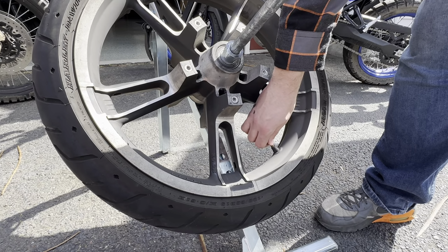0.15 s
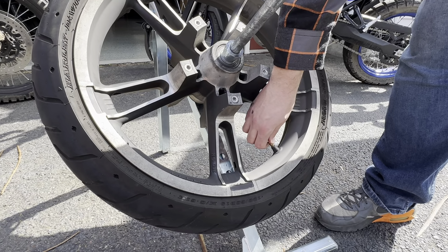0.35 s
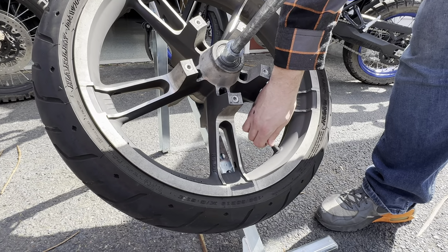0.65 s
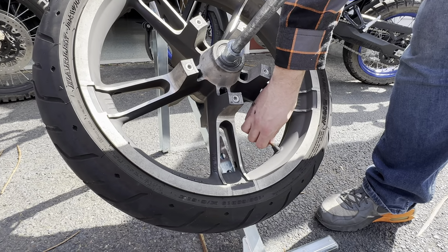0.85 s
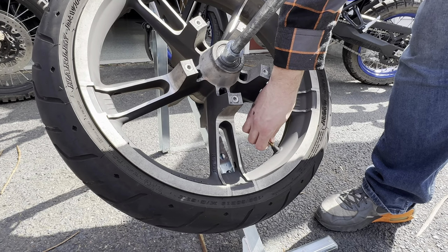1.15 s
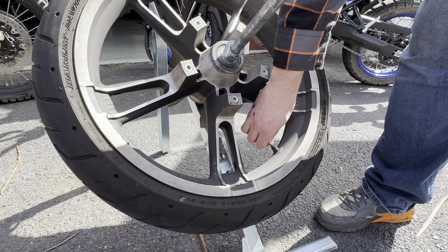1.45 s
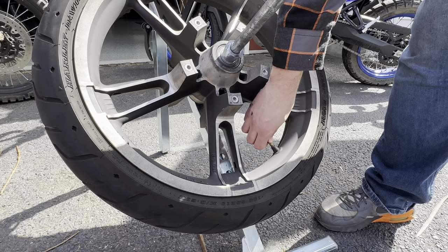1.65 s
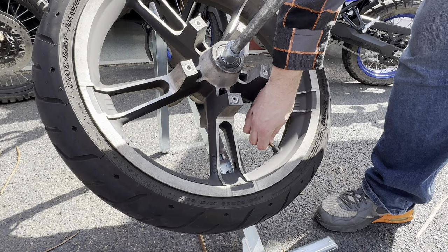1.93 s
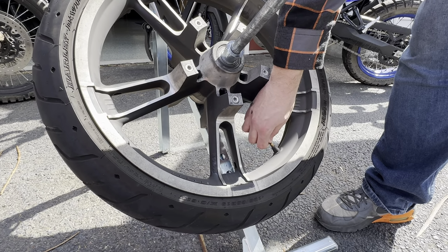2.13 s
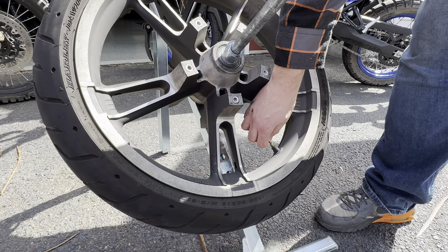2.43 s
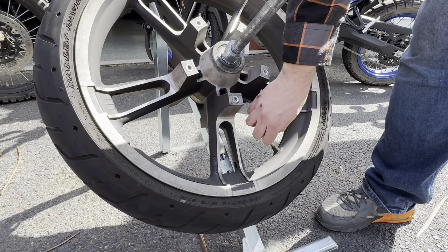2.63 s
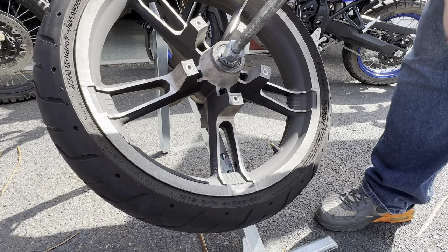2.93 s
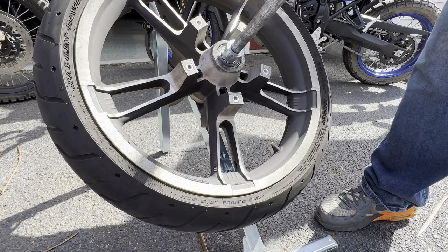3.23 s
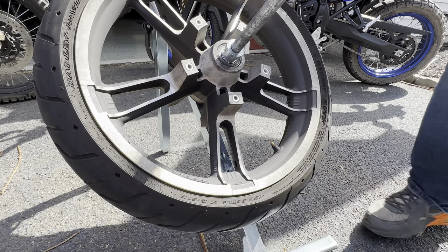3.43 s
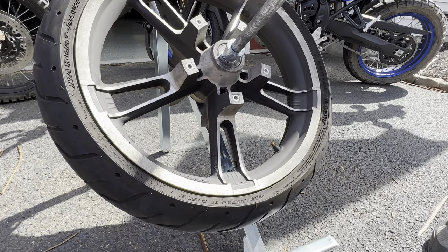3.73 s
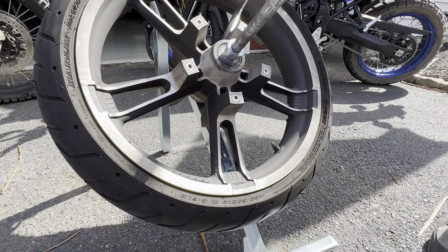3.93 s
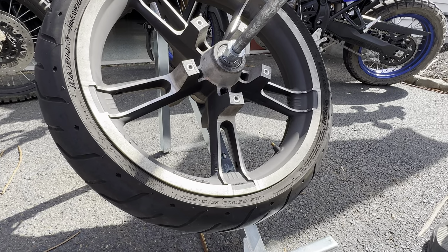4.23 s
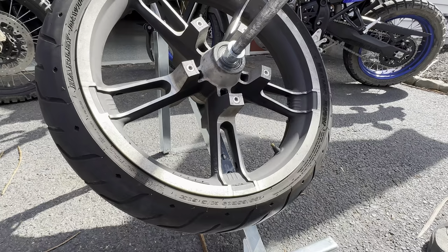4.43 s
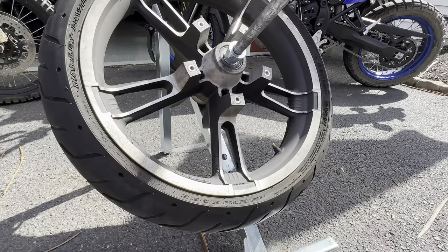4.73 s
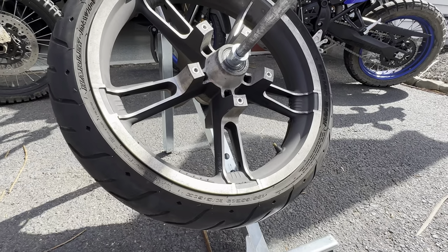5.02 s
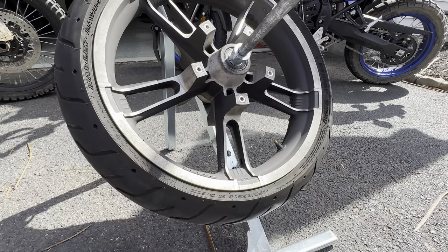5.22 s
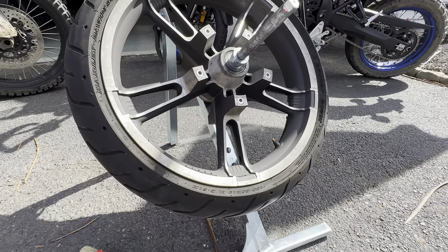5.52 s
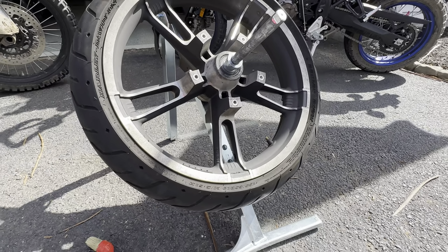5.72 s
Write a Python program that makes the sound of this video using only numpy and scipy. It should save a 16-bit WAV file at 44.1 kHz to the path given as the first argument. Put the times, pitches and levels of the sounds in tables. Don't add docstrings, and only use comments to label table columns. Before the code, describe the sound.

Close to a motorcycle wheel in a paved yard, short thin hisses spit irregularly from the valve over very faint traffic rumble. The seal pops and air roars out between fingers in uneven surges. The hand lets go, leaving a brighter open jet with a brief low hum from the tire, then a quieter steady hiss that gradually sinks. Dry, centred, near microphone.

```python
import sys
import numpy as np
from scipy import signal
from scipy.fft import rfft, irfft, next_fast_len
from scipy.io import wavfile
from scipy.ndimage import uniform_filter1d, map_coordinates

SR = 44100
rng = np.random.default_rng(int(sys.argv[2]) if len(sys.argv) > 2 else 0)


def waveform_to_disk(signal):
    frames = np.transpose(np.atleast_2d(signal))
    scaled = np.clip(frames, -1, 1) * 32767
    samples = np.round(scaled).astype(np.int16)
    wavfile.write(sys.argv[1], SR, samples)


def field_ratio(decibels):
    return 10 ** (np.asarray(decibels, dtype=float) / 20)


N = 258867
T = np.arange(N) / SR
SIZE, HOP = 512, 128
HZ = np.fft.rfftfreq(SIZE, 1 / SR)
FRAME_S = np.arange(N // HOP + 2) * HOP / SR
POP_S = 1.6575

# (time [s], stage: 0 cupped, 1 free, 2 steady, 3 sinking)
STAGE = [
    (2.675, 0),
    (2.7, 1),
    (3.4, 1),
    (3.8, 2),
    (4.35, 2),
    (4.65, 3),
]


def read(points, hz):
    f, value = np.transpose(points)
    return np.interp(np.log(hz + 1), np.log(f + 1), value)


def evened(x):
    return x / np.sqrt(np.mean(x ** 2) + 1e-20)


def coloured(gain):
    size = next_fast_len(N)
    spectrum = rfft(rng.standard_normal(size)) * gain(np.fft.rfftfreq(size, 1 / SR))
    return evened(irfft(spectrum, size)[:N])


def yard():
    # (frequency [Hz], level [dB per Hz])
    yard_colour = [(24, -49), (40, -1), (117, 0.5), (170, -10), (254, -9.5), (295, -11.5), (398, -12.5),
                   (578, -15), (761, -10), (820, -11.5), (1460, -18), (2400, -28.5), (15600, -25)]

    def gain(hz):
        trough_db = 3.3 * np.exp(-((hz - 4600) / 1800) ** 2)
        return field_ratio(read(yard_colour, hz) - trough_db)

    return field_ratio(-63) * coloured(gain)


def flow():
    # (time [s], fizz [dB], dullness [dB])
    slow_flow = [(1.665, -47, 4), (1.691, -34, 2), (1.73, -30.5, 7), (1.86, -29, 1), (1.89, -31.5, -1),
                 (2.04, -29, 0), (2.07, -27.5, 4), (2.2, -25, 0), (2.578, -27, 2.5), (2.672, -30.5, 9),
                 (2.692, -29, -1), (2.84, -31.5, -0.5), (2.896, -27, -3.5), (3.4, -37, 2.5),
                 (3.938, -35, .5), (5.07, -35.5, -2), (5.49, -38.5, 0.5), (5.87, -38, 0)]
    # (time [s], half length [s], level [dB], dullness [dB])
    surges = [
        (1.765, 0.035, 1.5, -4.5),
        (1.846, 0.015, 4.5, -1),
        (2.036, .011, 6, -6.5),
        (2.096, 0.025, 1.5, 1.5),
        (2.172, 0.019, 2.5, -1),
        (2.273, .045, 5, -2.5),
        (2.47, 0.042, 3, -2),
        (2.573, .011, 2, -3.5),
        (2.626, 0.032, 6, -2.5),
    ]
    s, level_db, dull_db = np.transpose(slow_flow)
    at, half, surge_db, surge_dull_db = np.transpose(surges)
    bumps = np.exp(-((FRAME_S[:, None] - at) / half) ** 2)
    level_db = np.interp(FRAME_S, s, level_db) + bumps @ surge_db
    return level_db, np.interp(FRAME_S, s, dull_db) + bumps @ surge_dull_db


def ring():
    # (time [s], hum [dB])
    hum_levels = [(1.66, -58.5), (2.635, -57.5), (2.7, -35.5), (3.08, -41), (3.37, -50.5), (3.5, -64),
                  (3.62, -52.5), (4.45, -54), (4.6, -50.5), (5.0, -52), (5.28, -57.5), (5.5, -66.5),
                  (5.87, -74)]
    # (frequency [Hz], level [dB per Hz])
    wash_colour = [(90, -20.5), (150, -2), (240, 2.5), (350, 4.5), (500, -6.5), (700, -23)]
    hum_hz, upper_hz = 468, 768
    below_hz, above_hz = 72, 46
    wash_base_db, empty_s = -51, 4.2

    def hum_gain(hz):
        width_hz = np.where(hz < hum_hz, below_hz, above_hz)
        main = 1 / (1 + (2 * (hz - hum_hz) / width_hz) ** 2) ** 0.77
        upper = field_ratio(-16.0) / (1 + (2 * (hz - upper_hz) / above_hz) ** 2)
        return main + upper

    hum_db = np.interp(T, *np.transpose(hum_levels))
    wash_db = wash_base_db + 0.18 * (np.maximum(hum_db, wash_base_db) - wash_base_db)
    wash_db -= 11.5 * ((T - POP_S) / empty_s) ** 4
    spill_db = np.interp(T, FRAME_S, sum(flow())) + 26.5 - 8.5 * (T - POP_S)
    wash_db += (T < STAGE[0][0]) * 0.95 * spill_db

    hum = coloured(hum_gain)
    hum = evened(hum / (uniform_filter1d(hum ** 2, size=1500) + .05) ** 0.25)
    wash = coloured(lambda hz: field_ratio(read(wash_colour, hz) - 60 * (hz > 900)))
    throb = coloured(lambda hz: (hz > 2) * (hz < 12))
    return (hum * field_ratio(hum_db + 0.2 * throb) + wash * field_ratio(wash_db)) * (T > POP_S)


def pop():
    # (frequency [Hz], level [dB], 60 dB decay [s])
    pop_modes = [(150, -26, 0.031), (300, -12, 0.013), (686, -15, 0.021), (920, -11, 0.019),
                 (1170, -15, 0.039), (2010, -15, 0.021), (3300, -14, .02)]
    t = T - POP_S
    after = np.maximum(t - .0003, 0)
    pulse = np.exp(-.5 * ((t - .0001) / 0.000087) ** 2)
    rings = sum(field_ratio(db - 60 * after / t60) * np.sin(2 * np.pi * hz * after) for hz, db, t60 in pop_modes)
    return field_ratio(-24) * (pulse - rings)


def colour_db(spectrum, echoes):
    ripples_db = sum(db * np.cos(2 * np.pi * HZ * ms / 1e3) for ms, db in echoes)
    return read(spectrum, HZ) + ripples_db


def glides_db(glides, width_hz, share):
    out = np.zeros((len(FRAME_S), len(HZ)))
    for start, end, from_hz, to_hz, db in glides:
        u = np.clip((FRAME_S - start) / (end - start), 0, 1)[:, None]
        hz = from_hz + (to_hz - from_hz) * u
        bell = np.exp(-2.8 * ((HZ - hz) / (width_hz + share * hz)) ** 2)
        out += db * np.sin(np.pi * u) * bell
    return out


def jet(level_db, shares_db, shape_db, boost_db, patchy_db, streak_db, flicker_db, stretch=1):
    # (low edge [Hz], high edge [Hz])
    bands_hz = [(11000, 15600), (6000, 11000), (1800, 6000), (600, 1700)]
    wanted = [0 * FRAME_S] + list(shares_db.T)
    edges_hz = bands_hz[:len(wanted)]
    power = field_ratio(2 * shape_db) / len(HZ)
    lift = []
    for want_db, (lo, hi) in zip(wanted, edges_hz):
        band_power = power[:, (HZ > lo) & (HZ < hi)].sum(1)
        lift.append(want_db - 10 * np.log10(band_power))

    centres_hz = [np.sqrt(lo * hi) for lo, hi in edges_hz[::-1]]
    place = np.interp(np.log(HZ + 1), np.log(centres_hz), np.arange(len(lift))[::-1])
    blend = np.maximum(1 - abs(place - np.arange(len(lift))[:, None]), 0)

    patches = rng.standard_normal(boost_db.shape)
    patches = evened(uniform_filter1d(uniform_filter1d(patches, size=30, axis=0), size=5, axis=1))
    streaks = evened(uniform_filter1d(rng.standard_normal(boost_db.shape), size=90, axis=0))
    frame, place_bin = np.indices(streaks.shape)
    streaks = evened(map_coordinates(streaks, [frame, place_bin / stretch], order=1))

    field_db = shape_db + boost_db + np.transpose(lift) @ blend
    field_db = field_db + patchy_db * patches + streak_db * streaks
    z = signal.stft(rng.standard_normal(N + HOP), nperseg=SIZE, noverlap=SIZE - HOP)[2][:, :len(FRAME_S)]
    air = signal.istft(z * field_ratio(field_db.T), nperseg=SIZE, noverlap=SIZE - HOP)[1][:N]
    flutter = evened(coloured(lambda hz: (hz > 12) / np.sqrt(hz + 10) / (1 + (hz / 400) ** 2)))
    return air * field_ratio(np.interp(T, FRAME_S, level_db) + flicker_db * flutter)


def leak():
    # (start [s], length [s], fizz [dB], swell [dB], dullness [dB])
    spurts = [(.0, 0.048, -78, 3, 13.5), (0.063, 0.11, -72, 8.5, 4), (0.249, .21, -61.5, 2.5, -1.5),
              (0.501, 0.084, -75, 8.5, 5.5), (0.81, 0.033, -63.5, -1.5, 9), (.19, .05, -79, 0, 10),
              (0.852, 0.24, -62.5, 8, 1), (1.111, 0.037, -58, -6, 10), (1.155, .04, -66.5, -4, 2),
              (1.2, 0.17, -79.5, -1.5, 14), (1.394, .06, -66.5, 1, 1), (1.479, 0.056, -47.5, 3.5, 1),
              (1.555, 0.1, -57, 0.5, 2.5)]
    # (frequency [Hz], level [dB per Hz])
    thin = [(1020.0, -12.5), (1700, -14.5), (2200, -2), (3400, -7), (5000, -6.5), (7000, -4), (9500, 0.5),
            (12000, -2), (15700, 2.5)]
    # (delay [ms], ripple depth [dB], negative = inverted)
    thin_echoes = [(0.33, -0.34), (0.477, -0.51), (0.57, 0.7), (0.93, 0.18), (1.092, -0.48), (1.167, 1),
                   (1.233, -1.1), (1.389, -1.1), (2.13, -0.56)]
    # (start [s], end [s], from [Hz], to [Hz], boost [dB], negative =
    leak_glides = [(-0.61, .5, 6800, 6800, 3), (0.0087, 0.29, 8900, 9600, 5), (.22, .5, 13800, 10500, 1),
                   (.74, 0.87, 8300, 10600, 8), (.95, 1.2, 11000, 11000, 7), (1.15, 1.6, 14500, 14500, -5),
                   (0, .27, 14000, 14000, -2), (1.38, 1.7, 9500, 7200, 1), (0.35, .8, 14500, 14500, -3)]
    open_s, shut_s, sealed_db = 0.01, 0.013, -89

    start, length, db, swell_db, dull_db = np.transpose(spurts)[:, :, None]
    since = FRAME_S - start
    edges = np.minimum(since / open_s, 0) + np.minimum((length - since) / shut_s, 0)
    spurt_flow = field_ratio(db + swell_db * np.clip(since / length, 0, 1) + 10 * edges)
    total = spurt_flow.sum(0) + field_ratio(sealed_db)
    dullness_db = (spurt_flow * dull_db).sum(0) / total
    # dB over the fizz, and how far each follows the dullness
    shares_db = np.add((-1.9, -9.5), np.outer(dullness_db, (0.53, 1.23)))
    air = jet(20 * np.log10(total), shares_db, colour_db(thin, thin_echoes)[None],
              glides_db(leak_glides, width_hz=100, share=0.2), patchy_db=0.3, streak_db=2.5, flicker_db=0.2)
    return air * (T < POP_S)


def blow():
    # (frequency [Hz], level [dB per Hz])
    cupped = [(360.0, -75), (600, -22.5), (900, -13), (1500, -15), (2200, -9), (3400, -4), (5000, -5),
              (7000, -2.5), (9500, 1.5), (12000, -0.3), (15700, -1.5)]
    free = [(360.0, -32), (600, -22.5), (900, -18.5), (1500, -17.5), (2200, -4.0), (3400, -2), (5000, -0.5),
            (7000, -3.5), (9500, 0.0), (12000, -1), (15700, -5)]
    steady = [(360.0, -33), (600, -10), (900, -11.5), (1500, -10.5), (2200, -5.5), (3400, -5), (5000, -4.5),
              (7000, -0.5), (9500, -0.7), (12000, 0.5), (15700, -3)]
    sinking = [(360.0, -45), (600, -8), (900, -14), (1500, -7.5), (2200, -3), (3400, -6.5), (5000, -7.5),
               (7000, -4.5), (9500, -4), (12000, 1), (15700, -5)]
    # (delay [ms], ripple depth [dB], negative = inverted)
    cupped_echoes = [(0.462, 0.4), (0.843, 0.3), (0.999, 0.4), (1.092, -0.5), (1.161, 0.3), (1.224, -0.6),
                     (1.608, 0.64), (1.725, -0.00075), (1.824, -1.1)]
    free_echoes = [(0.336, 0.6), (0.417, -0.56), (0.654, -0.1), (0.885, -0.5), (0.975, -0.7), (1.098, 0.1),
                   (1.338, -0.5), (1.825, -0.3), (2.28, 0)]
    steady_echoes = [(0.414, 0.082), (0.657, -0.057), (0.837, 0.55), (0.966, -0.24), (1.032, 0.032),
                     (1.089, 0.15), (1.341, -0.4), (1.794, -1.1), (2.133, -0.71)]
    sinking_echoes = [(0.342, 0.5), (0.414, -0.83), (0.495, -0.54), (0.606, 0.27), (0.792, 0.43),
                      (0.831, 1), (0.924, 0.7), (1.092, 0.98), (1.242, -0.73)]
    # (hiss [dB], body [dB], low roar [dB])
    stage_shares = [
        (0.81, -5.5, -16.5),
        (2.9, -1, -13.5),
        (2.3, -1.5, -17),
        (3.3, -1.5, -18),
    ]
    # (hiss [dB/dB], body [dB/dB], low roar [dB/dB])
    blow_follow = (.6, 1.29, 0.99)
    # (time [s], factor)
    path_stretch = [
        (2.68, 1.06),
        (3.5, 1.25),
        (4.4, 1.545),
        (5.87, 1.49),
    ]
    # (start [s], end [s], from [Hz], to [Hz], boost [dB], negative =
    blow_glides = [(1.67, 2.12, 810, 740, 8.5), (2, 2.4, 11600, 11000, 2.5), (2.34, 2.62, 9000, 8000, 3.5),
                   (2.75, 3.48, 4100, 4800, 2.5), (3.04, 3.43, 5000, 5600, 2.5), (3.25, 4.7, 3430, 3640, 4),
                   (4.09, 6, 3820, 2070, 4.5), (4.7, 5.1, 4100, 3900, 5.5), (2.6, 3.3, 3500, 4000, 5.5),
                   (3.77, 4.15, 7900, 9000, 9.5), (4.05, 4.7, 7540, 9050, 6), (1.81, 2.28, 1270, 1450, 7.5),
                   (2.5, 2.04, 3600, 4100, -1), (5.28, 5.88, 2160, 1200, 4.5),
                   (1.69, 1.86, 1650, 1400, 7.5), (3.43, 3.6, 1700, 1700, -2), (3.1, 3.6, 480, 410, 7),
                   (2.4, 2.65, 14300, 14000, -5), (3.6, 4.3, 4300, 5000, 2), (5.4, 6.9, 400, 550, -8.5),
                   (5.4, 5.4, 680, 590, 2.5), (3.23, 3.65, 680, 890, -5), (4.8, 6.3, 11100, 7300, 2)]

    colours = np.array([colour_db(cupped, cupped_echoes), colour_db(free, free_echoes),
                        colour_db(steady, steady_echoes), colour_db(sinking, sinking_echoes)])
    stage = np.interp(FRAME_S, *np.transpose(STAGE))
    share = np.maximum(1 - abs(stage[:, None] - np.arange(len(colours))), 0)
    level_db, dull_db = flow()
    shares_db = share @ stage_shares + np.outer(dull_db, blow_follow)
    stretch = np.interp(FRAME_S, *np.transpose(path_stretch))[:, None]
    leg_ms = 1.55 / stretch
    leg_db = 0.8 * np.cos(2 * np.pi * HZ * leg_ms / 1e3) * (stretch > 1)
    boost_db = glides_db(blow_glides, width_hz=390, share=0.04) + leg_db
    air = jet(level_db, shares_db, share @ colours, boost_db,
              patchy_db=1.31, streak_db=1.5, flicker_db=0.53, stretch=stretch)
    return air * np.clip((T - POP_S) / .0015, 0, 1)


def surroundings(x, echo_db):
    taps = np.zeros(SR // 100)
    at = rng.integers(120, len(taps), size=14)
    taps[at] = field_ratio(echo_db - 400 * at / SR) * rng.choice([-1., 1.], size=14)
    taps[0] = 1
    return signal.oaconvolve(x, taps / np.linalg.norm(taps))[:N]


def scene():
    jets = surroundings(leak() + blow(), echo_db=-22)
    mono = jets + ring() + pop() + yard()
    return np.array([mono, mono])


def roll_off(x):
    return signal.sosfilt(signal.butter(12, 16850, fs=SR, output="sos"), x)


def record(dry):
    # (time [s], low edge [Hz], high edge [Hz])
    swaps = [(0.013, 4500, 5700), (0.311, 7500, 9000), (0.313, 4100, 5300), (1.078, 7500, 9700),
             (1.264, 5100, 6500), (1.428, 5100, 7700), (1.962, 5600, 7700), (2.127, 8200, 9800),
             (2.404, 5600, 7000), (2.519, 6200, 7600), (2.54, 9600, 11100), (2.587, 4100, 5300),
             (2.706, 12200, 13900), (2.844, 4500, 5800), (2.846, 10900, 13100), (2.938, 14300, 15700),
             (3.192, 8800, 10500), (3.193, 5600, 7000), (3.194, 4100, 5100), (3.66, 5500, 7000),
             (3.891, 11600, 13200), (3.915, 4600, 5800), (4.586, 14400, 15700), (5.013, 7500, 11100),
             (5.142, 12400, 13900), (5.605, 7500, 9000)]
    limit = .7
    lowpass = signal.firwin(2047, 15760, window=("kaiser", 10), fs=SR)
    mono = signal.oaconvolve(limit * np.tanh(dry[0] / limit), lowpass, "same")
    z = signal.stft(mono, nperseg=SIZE, noverlap=SIZE - HOP)[2]
    s = np.arange(z.shape[1]) * HOP / SR
    swapped = sum(np.outer((HZ > lo) & (HZ < hi), np.exp(-((s - at) / .013) ** 4)) for at, lo, hi in swaps)
    random_phase = np.exp(2j * np.pi * rng.random(z.shape))
    apart = signal.istft(z * swapped * random_phase, nperseg=SIZE, noverlap=SIZE - HOP)[1][:N]
    return roll_off(mono + field_ratio(3) * np.array([apart, -apart]))


dry = scene()
out = record(dry)
waveform_to_disk(out)
```